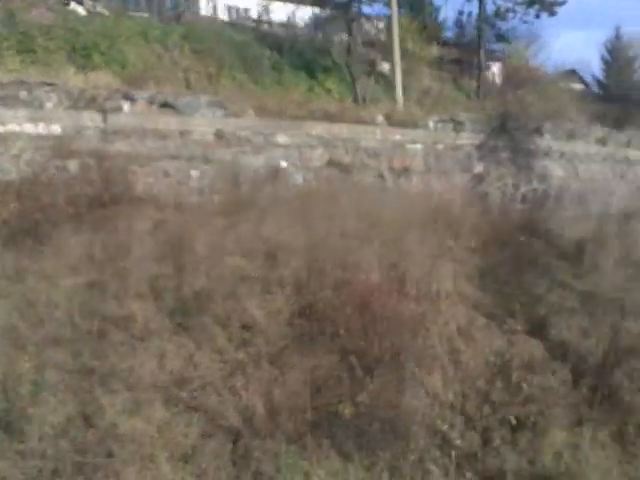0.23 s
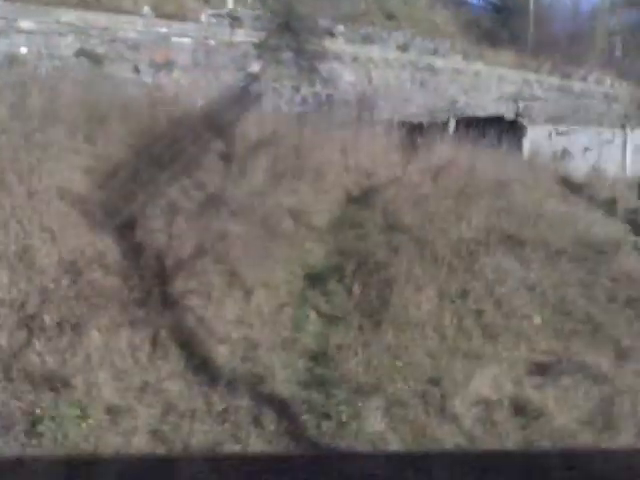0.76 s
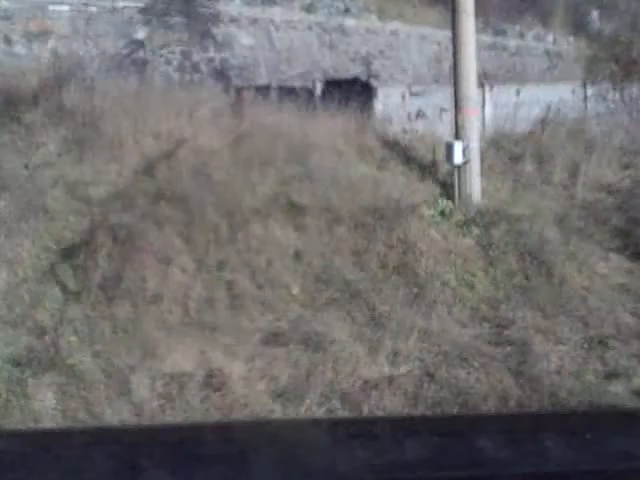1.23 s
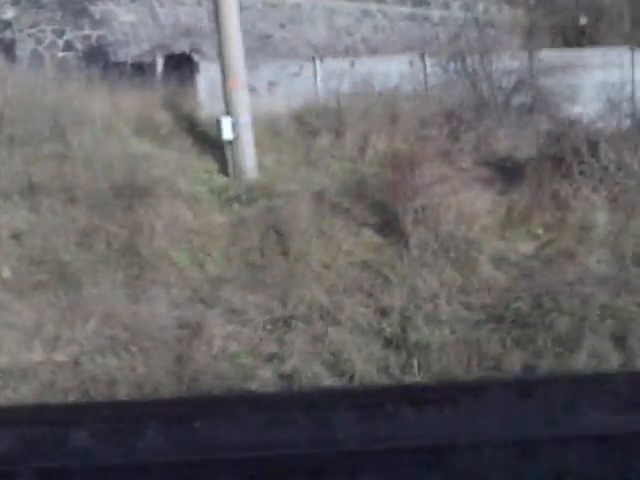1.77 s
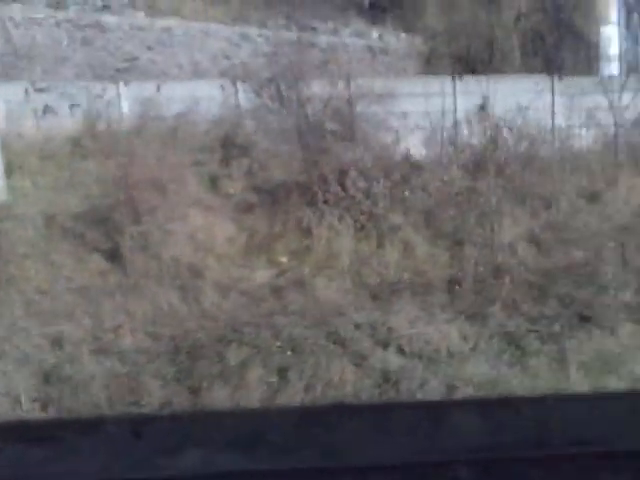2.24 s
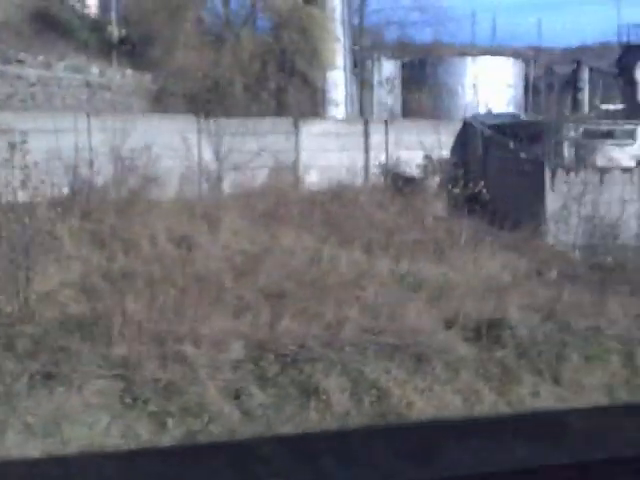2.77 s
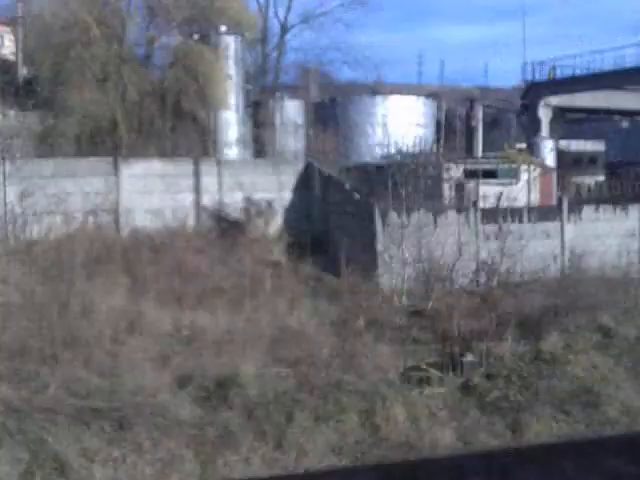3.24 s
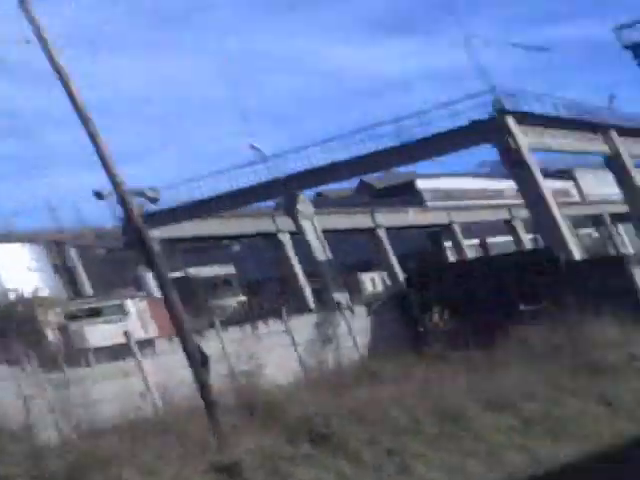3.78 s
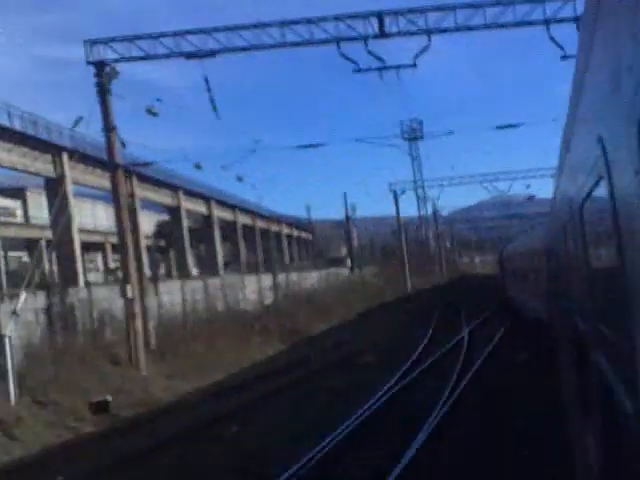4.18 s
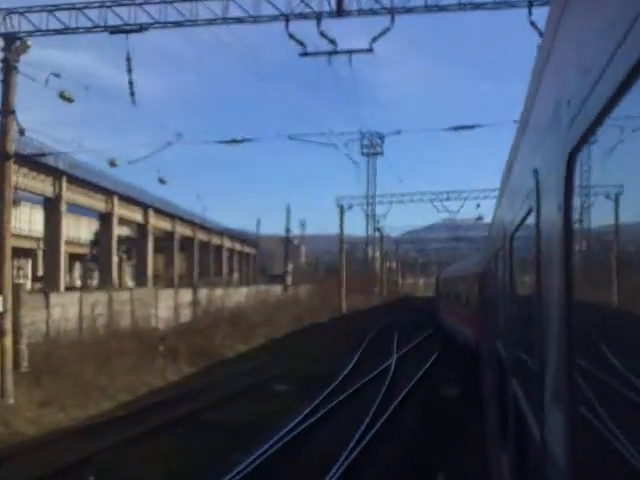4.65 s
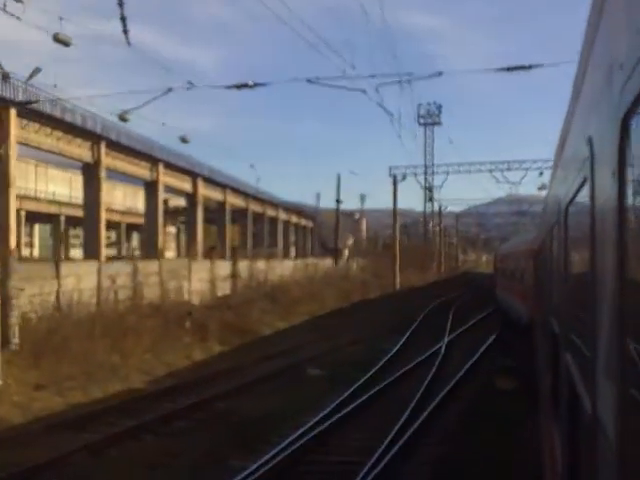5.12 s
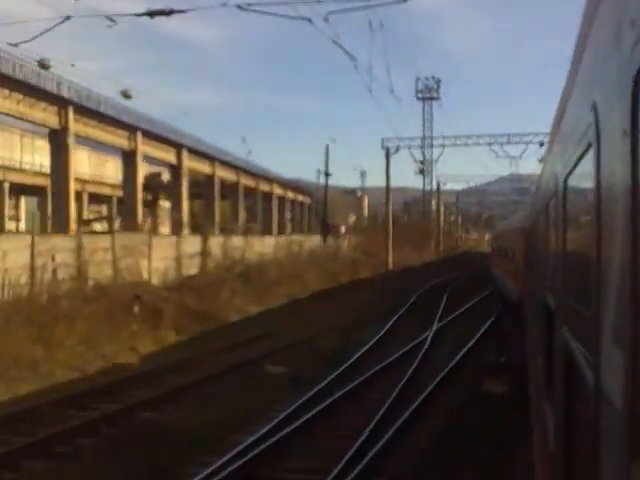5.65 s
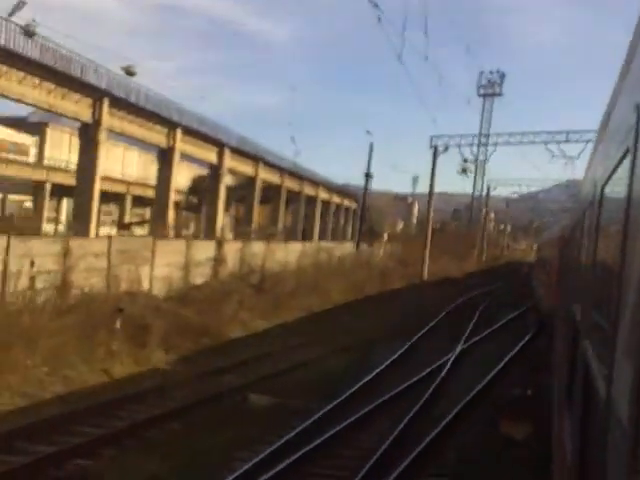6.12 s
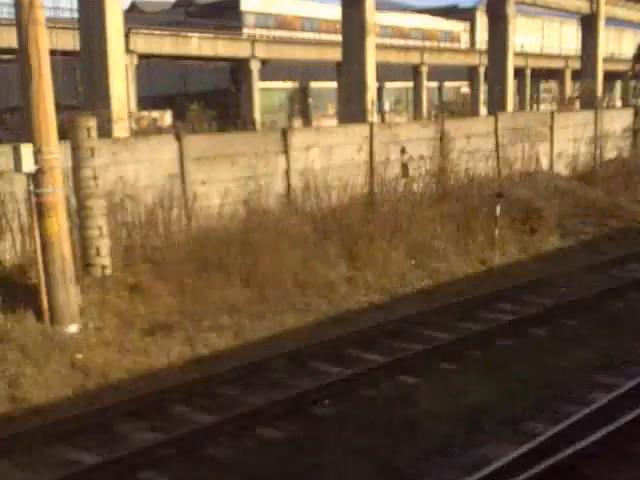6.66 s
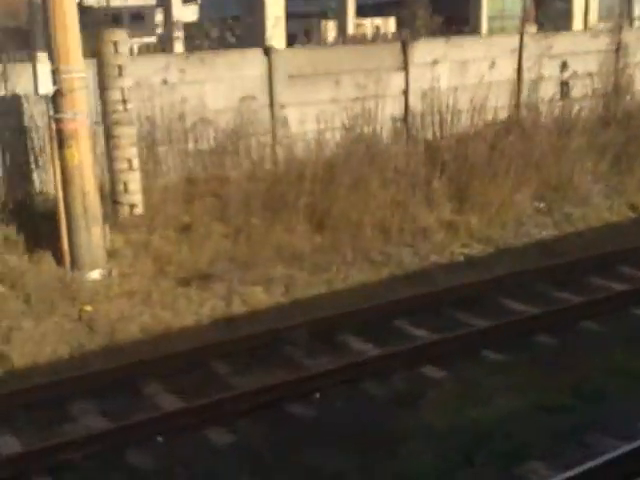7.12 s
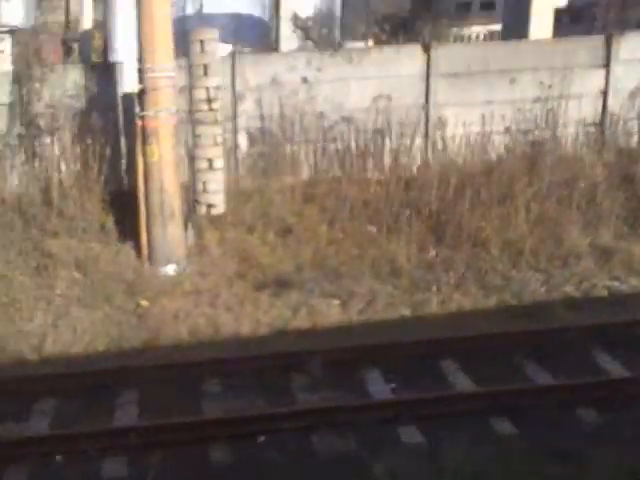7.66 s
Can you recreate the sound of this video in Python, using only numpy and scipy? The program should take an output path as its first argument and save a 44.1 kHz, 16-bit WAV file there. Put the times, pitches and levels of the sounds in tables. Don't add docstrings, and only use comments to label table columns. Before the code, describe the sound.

At an open train window, nearly a second of very faint airflow gives way to thumping wind pops and hard steel bangs over rail joints. The blows come in irregular clusters, ringing briefly, with rough rolling hiss between them. A lull near four seconds precedes heavier clatter over switches, densest after six seconds, then fading. The phone microphone is narrow-band and overloads harshly.

```python
import sys
import numpy as np
from scipy import signal
from scipy.fft import rfft, irfft, next_fast_len
from scipy.io import wavfile
from scipy.ndimage import uniform_filter1d, map_coordinates

SR = 44100
rng = np.random.default_rng(int(sys.argv[2]) if len(sys.argv) > 2 else 0)


def volts_from_decibels(level):
    exponent = np.asarray(level, float) / 20
    return 10 ** exponent


def generate_wav(signal):
    frames = np.transpose(np.atleast_2d(signal))
    scaled = np.clip(frames, -1, 1) * 32767
    pcm = np.round(scaled).astype(np.int16)
    wavfile.write(sys.argv[1], SR, pcm)


N = 347949

# centre_hz, width_hz, level_db
WHEEL_MODES = [(1077, 85, -16.5), (1250, 13, -15), (1670, 14, -1.5), (2061, 15, -5), (2316, 33, -4),
               (2750, 27, 1), (3330, 51.5, -7.5)]


def unit(x):
    return x / np.sqrt(np.mean(x ** 2) + 1e-20)


def along(points, hz):
    f, db = np.transpose(points)
    return volts_from_decibels(np.interp(np.log(hz + 1), np.log(f + 1), db))


def curve(rows):
    return np.interp(np.arange(N) / SR, *np.transpose(rows))


def filtered(x, response):
    size = next_fast_len(len(x) + 8192)
    gain = response(np.fft.rfftfreq(size, 1 / SR))
    return irfft(rfft(x, size) * gain, size)[:len(x)]


def wobble(rate):
    knots = rng.standard_normal(int(N * rate / SR) + 4)
    return map_coordinates(knots, [np.arange(N) * rate / SR])


def patchy(count, patchy_db):
    z = signal.stft(rng.standard_normal(count + 512), nperseg=512)[2]
    field = uniform_filter1d(rng.standard_normal(z.shape), size=4, axis=0)
    field = uniform_filter1d(field, size=6, axis=1)
    return signal.istft(z * volts_from_decibels(patchy_db * unit(field)), nperseg=512)[1][:count]


def add(track, s, sound):
    part = track[round(s * SR):][:len(sound)]
    part += sound[:len(part)]


def ringing(hz, strength_db):
    total = 0
    for k, (centre, width, db) in enumerate(WHEEL_MODES):
        damping = 1j * hz * width
        resonance = damping / (centre * centre - hz * hz + damping)
        total = total + (-1) ** k * volts_from_decibels(db + strength_db[k]) * resonance
    return total


def joints():
    # start_s, peak_db, fall_db_per_100ms, brightness_db_per_octave
    joint_blows = [(1.015, -28, 15, -1.5), (1.303, -13.5, 13, -0.5), (1.442, -15.5, 39, -13),
                   (1.488, -13.5, 18.5, -13), (1.655, -1.5, 20.5, -2.5), (1.978, -5, 40, -18),
                   (2.197, -22, 14.5, 2), (2.32, 0, 28, -3.5), (2.555, -14, 25.5, 8),
                   (2.689, -9.5, 20.5, 0), (3.252, -17.5, 11.5, 0.5), (3.601, -9, 18.5, 10),
                   (4.618, -22, 6, -6), (4.665, -20.5, 34.5, -0.5), (4.872, -5.5, 10.5, -4.5),
                   (4.922, -4.5, 12, -1), (5.251, -3, 7.5, -0.5), (5.82, -23, 15, -5),
                   (5.861, -19, 21.5, -7.5), (5.957, -1.5, 8.5, -0.5), (6.14, -15.5, 4, 9.5),
                   (6.24, -8, 48, 0), (6.338, -8.5, 8.5, 7), (6.37, -7.5, 20, 0), (6.555, -11.5, 31.5, 14),
                   (6.617, -14, 22.5, 9), (6.808, -14, 12.5, -3), (6.923, -12.5, 31, 0),
                   (6.981, -2.1, 6, 1), (7.368, -3, 9.5, -0.5)]
    # freq_hz, level_db
    clash_spectrum = [(350, -20.5), (600, -15.5), (1180, -8.5), (1670, -6.5), (1810, -4.5), (2310, -3),
                      (3230, -6.5), (4000, -14.5), (5200, -48), (8800, -120)]
    # freq_hz, level_db
    thud_spectrum = [(15, -70), (25, -16), (140, -17.5), (273, -0.5), (483, -8), (632, -2.5), (776, -4),
                     (1100, -9.5), (1430, -39), (2420, -120)]
    ring_lasts = 0.69
    track, t = np.zeros(N), np.arange(SR // 2) / SR
    for s, db, fall_db, tilt_db in joint_blows:
        rise_ms = 7.54 - 0.16 * db
        fall_db_per_s = abs(fall_db) * 10
        strength_db = 4 * rng.standard_normal(len(WHEEL_MODES)) + 0.68

        tilt = lambda hz: volts_from_decibels(tilt_db * np.log2(np.clip(hz, 600, 4000) / 2000))
        rattle = filtered(patchy(len(t), patchy_db=2.0), lambda hz: along(clash_spectrum, hz) * tilt(hz))
        ring = filtered(rattle, lambda hz: ringing(hz, strength_db))
        lasting_ring = ring * volts_from_decibels((1 - ring_lasts) * fall_db_per_s * t)
        clash = (3 * rattle + lasting_ring) / np.std(3 * rattle + ring)
        thud = unit(filtered(rng.standard_normal(len(t)), lambda hz: along(thud_spectrum, hz)))
        short_thud = thud * volts_from_decibels(-7 - 35 * t)

        swell = 1 - np.exp(-(t * 1000 / rise_ms) ** 2)
        heavy = np.clip((db + 9) / 8, 0, 1)
        crossing = 1 + .55 * heavy * np.exp(-(t / .05) ** 8)
        rolls_off_db = heavy * 5 * (t / 0.17) ** 4
        fall = volts_from_decibels(-fall_db_per_s * t - rolls_off_db)
        add(track, s, volts_from_decibels(db - 6) * swell * crossing * fall * (clash + short_thud))
    return track


def rolling():
    # freq_hz, level_db
    steel_spectrum = [(410, -45), (700, -14), (1060, -6), (1150, -9.5), (1680, -2.5), (2800, -2.5),
                      (3510, -8.5), (4000, -14), (5200, -37), (8800, -120)]
    # time_s, level_db
    track_level = [(0, -51.5), (.9, -56.5), (1.1, -43.5), (1.55, -37.5), (2.02, -44.5), (2.48, -33),
                   (3.05, -41.5), (3.76, -32), (4.15, -43), (4.75, -35.5), (5.21, -31.5), (5.55, -35),
                   (5.75, -48), (6.1, -26), (6.45, -27), (6.77, -31.5), (6.97, -27), (7.89, -36)]
    even = np.zeros(len(WHEEL_MODES))
    steel = lambda hz: along(steel_spectrum, hz) * (1 + volts_from_decibels(-1.0) * ringing(hz, even))
    flutter = volts_from_decibels(1.4 * wobble(25))
    hiss = unit(flutter * filtered(patchy(N, patchy_db=3.5), steel))
    return volts_from_decibels(curve(track_level) + 0.87 * wobble(7)) * hiss


def sings():
    # start_s, level_db, pitch_hz, length_s
    sung_modes = [(1.312, -16, 2482, 0.032), (1.406, -27.5, 3350, 0.036), (1.716, -20.5, 2272, 0.068),
                  (2.373, -21, 2330, 0.099), (2.386, -22, 3050, 0.054), (3.266, -16.5, 1077, 0.087),
                  (5.058, -25, 1930, 0.12), (5.04, -24, 3586, 0.077), (5.613, -42, 1730, 0.45),
                  (5.821, -25, 1077, 0.11), (5.857, -21.5, 1683, 0.047), (6.233, -18, 2308, 0.11),
                  (6.262, -17, 1690, 0.028), (6.614, -23.5, 1250, 0.069), (6.813, -20.5, 1217, 0.055),
                  (7.421, -11.5, 1656, 0.063), (1.495, -24.5, 2430, 0.061), (2.326, -6.5, 2620, 0.045),
                  (2.7, -14, 2333, 0.048), (2.705, -13.5, 1644, 0.04), (3.599, -19, 2865, 0.037),
                  (3.612, -31.5, 3460, 0.049), (4.935, -14, 3510, 0.025), (6.267, -20, 3013, 0.042),
                  (6.834, -23, 3050, 0.042), (7.38, -12, 2406, 0.046), (2.042, -19, 572, 0.072),
                  (6.05, -20.5, 3154, 0.1), (6.16, -21, 2750, 0.1), (4.959, -22, 3237, 0.097)]
    track = np.zeros(N)
    for s, db, hz, length in sung_modes:
        t = np.arange(round(length * 1.08 * SR)) / SR
        drift, flutter = np.cumsum(rng.standard_normal((2, SR // 2)), axis=1)[:, :len(t)]
        tone = np.sin(2 * np.pi * hz * t + .09 * drift)
        rough = tone * (1 + 0.51 * np.sin(0.13 * flutter))
        swell = 1 - np.exp(-t / (0.088 * length))
        fade = np.sqrt(np.abs(1 - t / t[-1]))
        add(track, s - .003, volts_from_decibels(db) * swell * fade * rough)
    return track


def series(rows, width_ms, fade_db):
    out = []
    chances = rng.standard_normal((len(rows), 4, 8))
    for (s, length, db, hz), chance in zip(rows, chances):
        gaps_s = .011 * volts_from_decibels(-0.32 * min(db, 0)) * np.exp(.3 * chance[0])
        late = np.cumsum(gaps_s) - gaps_s[0]
        level = db - fade_db * (late / length) ** 2 - 1.5 * np.abs(chance[1])
        pitch = hz * np.exp(0.2 * chance[2])
        width = width_ms * np.exp(0.53 * chance[3])
        pushes = np.transpose([s + late, level, pitch, width])
        out += list(pushes[late <= length])
    return out


def pops():
    # middle_s, peak_db, pitch_hz, width_ms
    gust_pops = [(.945, -17.5, 850, 1.44), (.9763, -9, 714, 2.9), (1.1798, -11.5, 1120, 1.24),
                 (1.25, -4, 267, 4.5), (1.3254, -9, 650, 2.2), (1.3427, -12, 337, 7.8), (1.4494, 0, 436, 4),
                 (1.4634, -2.5, 574, 1.2), (1.4935, -6, 352, 1.9), (1.516, -10, 525, 7.3),
                 (1.607, -5.5, 540, 4.4), (1.6317, -6.5, 289, 14), (1.6512, -5, 736, 1.6),
                 (1.8412, -6.5, 510, 4.5), (1.9085, -9, 420, 3), (1.919, -6.5, 460, 10),
                 (1.9707, 0, 553, 4.5), (1.986, -6.5, 614, 1.8), (1.9978, -2.5, 597, 8.6),
                 (2.029, 1, 697, 3.8), (2.0645, -10, 550, 8.1), (2.128, -15.5, 433, 3.5),
                 (2.254, 3, 403, 4.2), (2.2822, -7, 602, 22), (2.3011, 1, 596, 4.1), (2.6082, -8, 450, 1.1),
                 (3.2937, -5, 307, 3.7), (3.471, -1, 287, 6.1), (3.6058, -6.5, 446, 4.2),
                 (6.3795, -2, 297, 6)]
    # start_s, length_s, peak_db, pitch_hz
    gust_flurries = [(.37, .07, -35, 380), (.766, .05, -29, 395), (.991, 0.044, -14, 524),
                     (1.087, 0.049, -28, 460), (1.198, .03, -23, 420), (1.282, .01, -18, 310),
                     (1.42, .025, -10.5, 570), (1.596, .008, -2, 613), (1.876, .01, -17.5, 372),
                     (1.932, .012, -8, 404), (2.005, .045, -5, 586), (2.078, .03, -7.5, 550),
                     (2.238, .035, -13, 456), (2.52, .14, -16.5, 377), (2.72, .14, -15.5, 480),
                     (2.919, .1, -17, 385), (3.235, .014, -5, 614), (3.259, .035, -5, 547),
                     (3.305, .012, -9, 940), (3.443, .04, -10.5, 317), (3.54, .01, -15.5, 315),
                     (3.568, .02, -6.5, 469), (3.615, .05, -13.5, 415), (3.875, .1, -20.5, 386),
                     (4.673, .015, -13.5, 284), (.17, .05, -37, 330), (1.455, .02, -5, 339),
                     (5.615, .02, -25, 356)]
    # start_s, length_s, peak_db, pitch_hz
    body_shudders = [(1.666, .08, -4.5, 465), (2.319, .035, -8, 429), (4.882, .062, 3.5, 275.5),
                     (4.975, .03, -14, 890), (5.261, .04, 1, 290), (5.31, .07, -12, 472),
                     (5.881, .01, -11, 1000), (5.975, .06, -.5, 377), (6.35, .015, -15, 900),
                     (6.392, .012, -5, 456), (6.52, .01, -16, 522), (6.842, .01, -20.5, 1200),
                     (6.999, .055, -.5, 490), (7.376, .035, -3, 514), (7.424, .015, -10, 740),
                     (7.06, 0.037, -11, 478), (6.9, 0.073, -19, 500)]
    track = np.zeros(N)
    t = np.arange(-SR // 25, SR // 25) / SR
    flurries = series(gust_flurries, width_ms=4.5, fade_db=1.5)
    shudders = series(body_shudders, width_ms=5, fade_db=6)
    pushes = gust_pops + flurries + shudders
    chance = rng.random((200, 2))
    for (s, db, hz, width_ms), (start, sag) in zip(pushes, chance):
        width = width_ms * 0.00066
        sagging = 1 - 0.44 * (sag - .3) * np.tanh(t / width)
        turn = 2 * np.pi * (hz * t * sagging + start)
        swing = np.exp(-(t / width) ** 2) * np.cos(turn)
        dull = lambda f: f / hz / (1 + (f / (1.144 * hz)) ** 4) + volts_from_decibels(-40) / (1 + (f / 2200) ** 2)
        puff = volts_from_decibels(-8.0) * unit(filtered(rng.standard_normal(len(t)), dull))
        trail = np.exp(-(t / np.where(t < 0, 1.1 * width, 2.3 * width)) ** 2)
        push = swing + trail * puff
        add(track, s + t[0], volts_from_decibels(db - 1.63) * push / np.abs(push).max())
    return filtered(track, lambda hz: hz ** 2 / (hz ** 2 + 110 ** 2))


def air_roar():
    # freq_hz, level_db
    roar_spectrum = [(15, -67.5), (25, -25), (90, -9.5), (335, 0.5), (673, -7.5), (740, -13.5),
                     (924, -12.5), (1100, -37.5), (1430, -46), (2420, -120)]
    # time_s, level_db
    air_level = [(0, -51.5), (.88, -50.5), (1.15, -42.5), (1.4, -33.5), (2.2, -26), (2.45, -33),
                 (2.75, -27), (3.1, -34), (3.68, -29.5), (4.15, -47), (4.3, -39), (4.55, -43), (5.3, -33.5),
                 (5.78, -47), (6.3, -33.5), (6.75, -36), (6.95, -31), (7.89, -42.5)]
    lumps = volts_from_decibels(2 * wobble(11) + 2.94 * wobble(60))
    roar = unit(lumps * filtered(patchy(N, patchy_db=-3.0), lambda hz: along(roar_spectrum, hz)))
    return volts_from_decibels(curve(air_level) + 1.5 * wobble(6)) * roar


def scene():
    return (joints() + rolling() + sings() + pops() + air_roar())[None]


def band_limit(x):
    return signal.sosfilt(signal.butter(12, 16640, fs=SR, output="sos"), x)


def record(dry):
    # freq_hz, level_db
    phone_band = [(15, -7.5), (120, 1), (3500, -1), (4000, -9.5), (4350, -12), (4700, -53.5), (5200, -130)]
    narrow = filtered(dry[0], lambda hz: along(phone_band, hz))
    clipped = np.clip(narrow, -0.71, 0.71)
    splashed = filtered(clipped, lambda hz: 1 / (1 + (hz / 15850) ** 150))
    return band_limit(splashed[None])


dry = scene()
out = record(dry)
generate_wav(out)
```